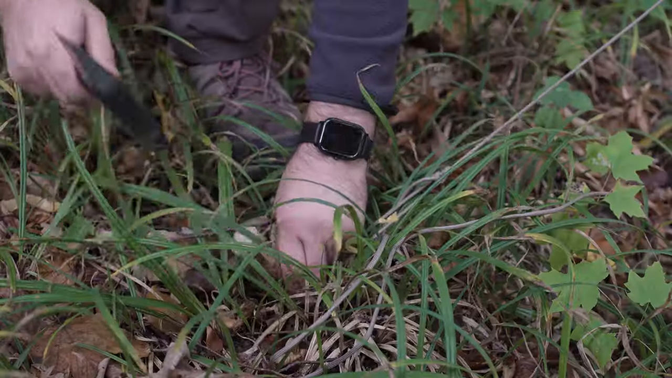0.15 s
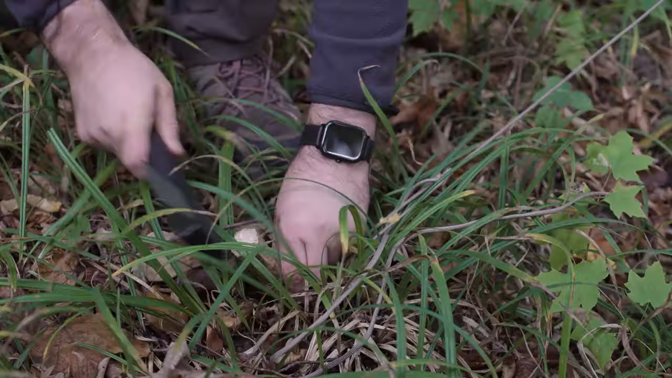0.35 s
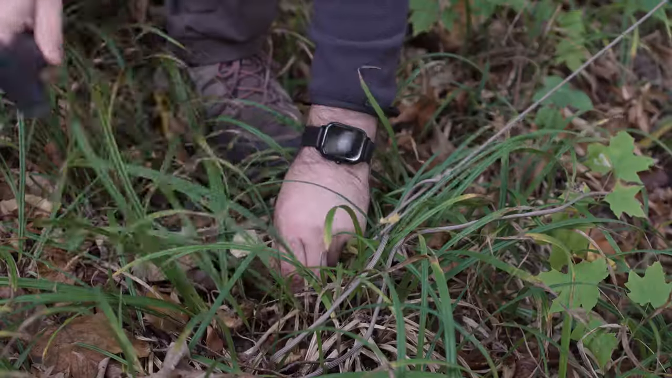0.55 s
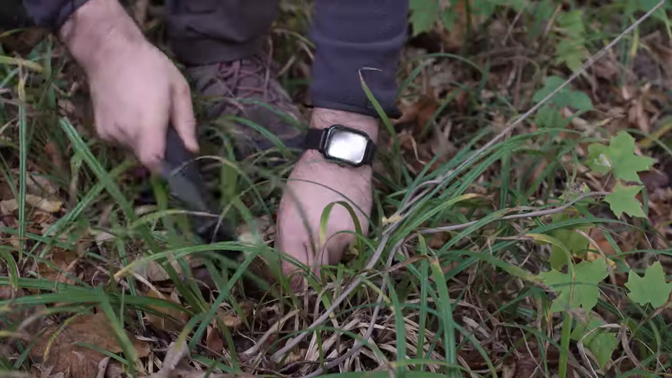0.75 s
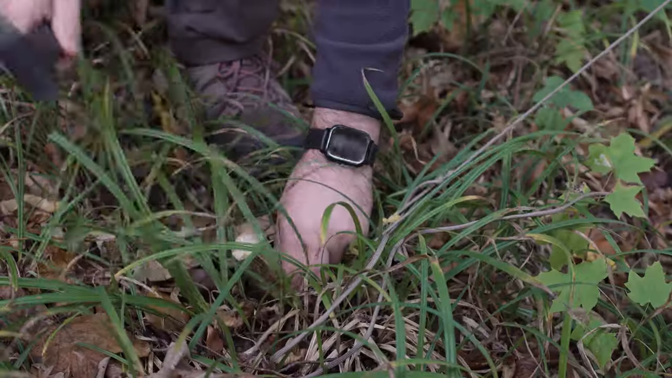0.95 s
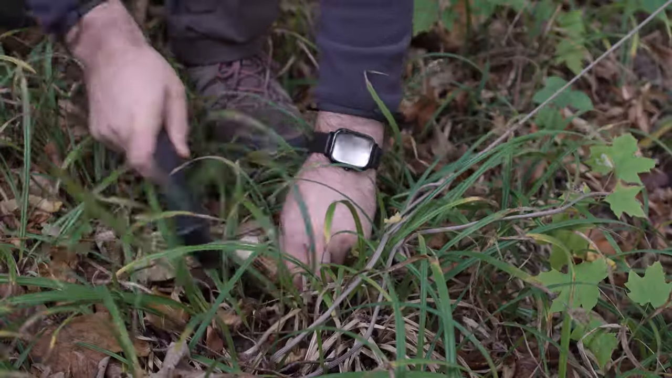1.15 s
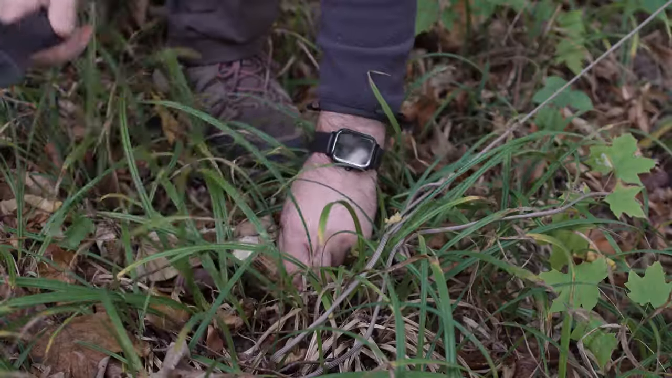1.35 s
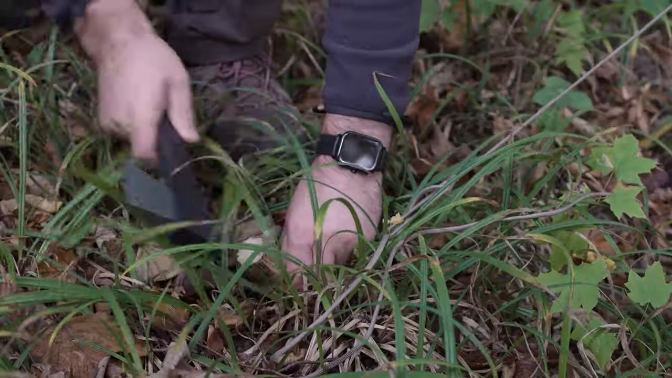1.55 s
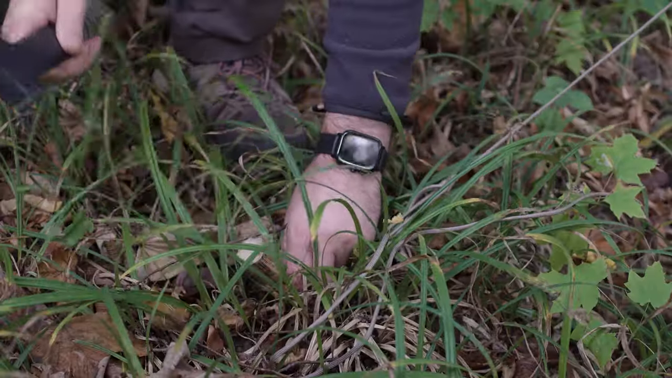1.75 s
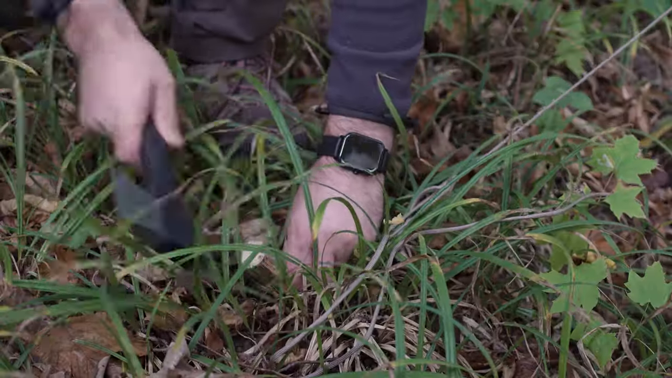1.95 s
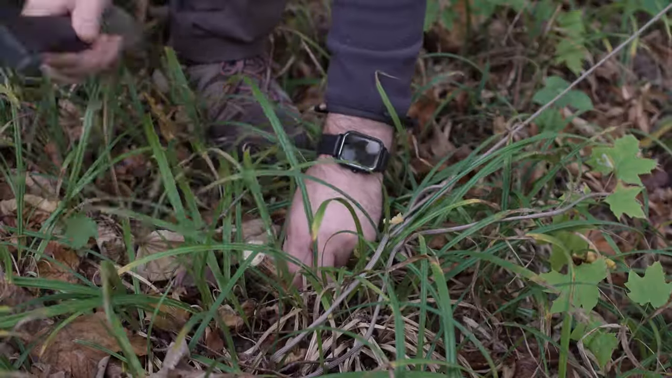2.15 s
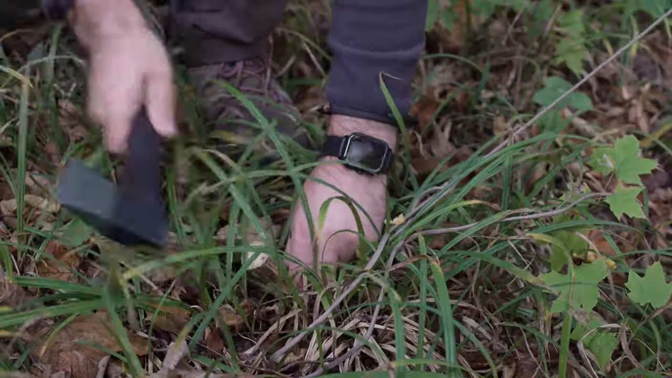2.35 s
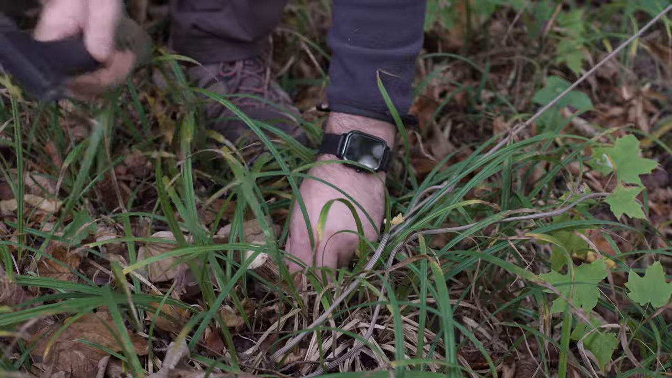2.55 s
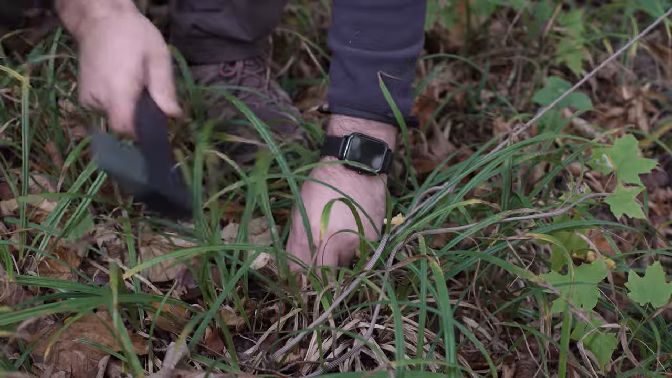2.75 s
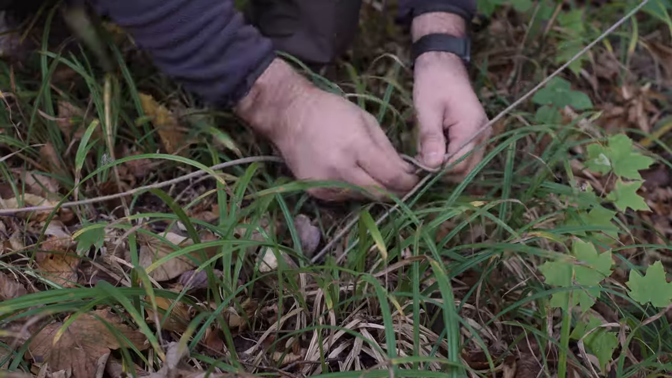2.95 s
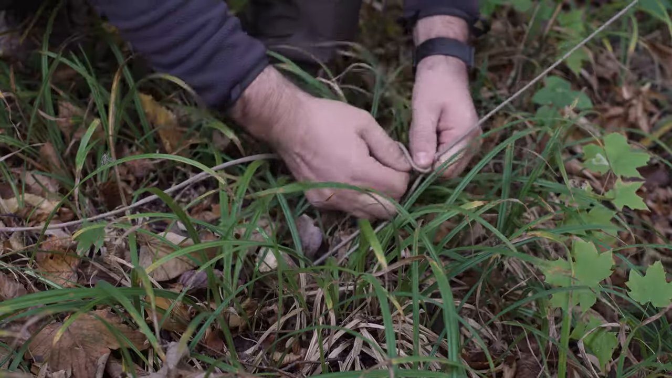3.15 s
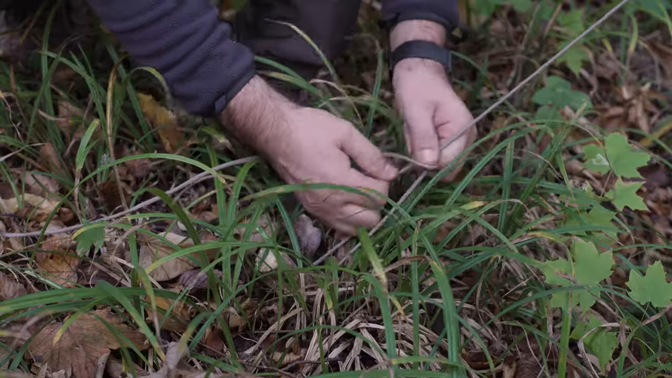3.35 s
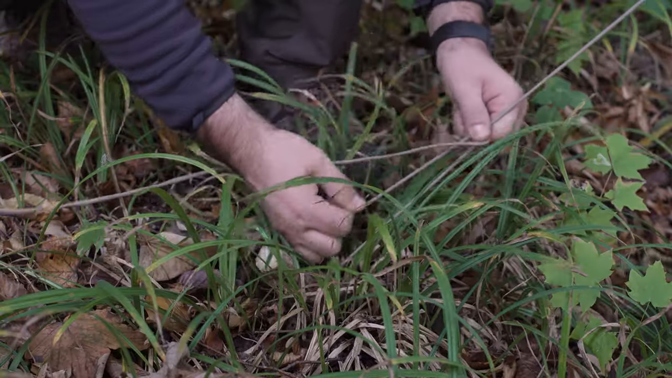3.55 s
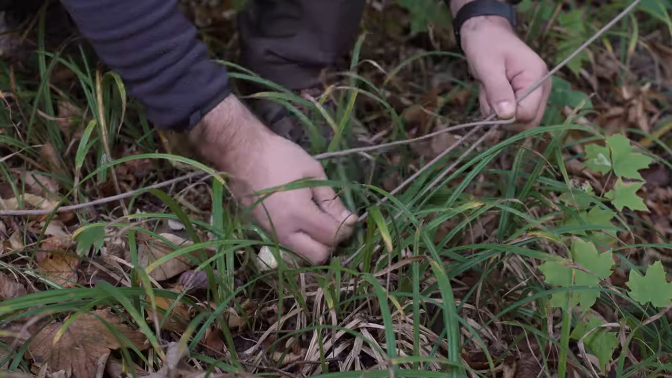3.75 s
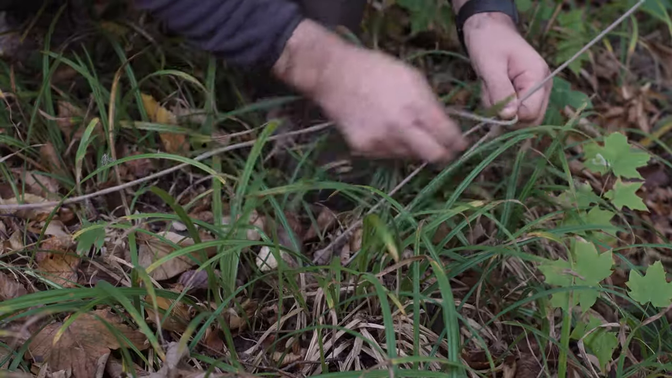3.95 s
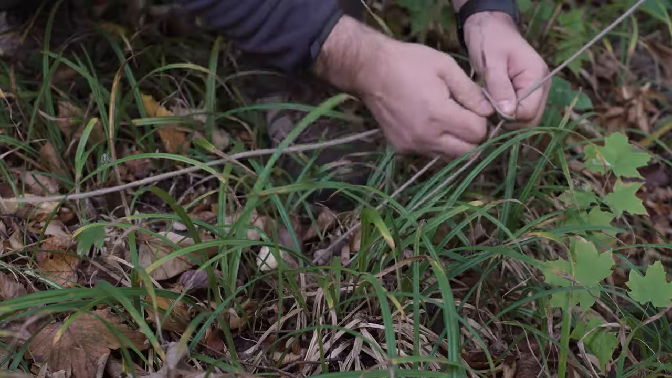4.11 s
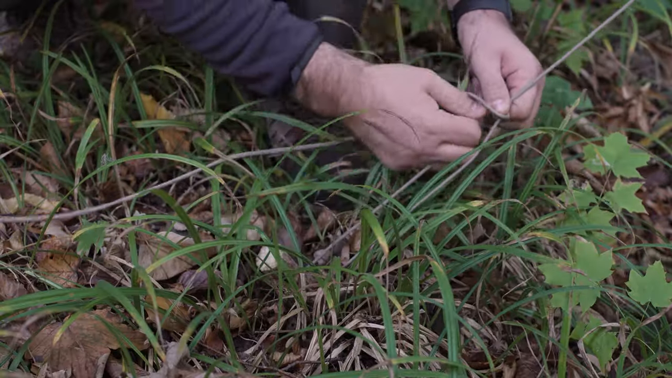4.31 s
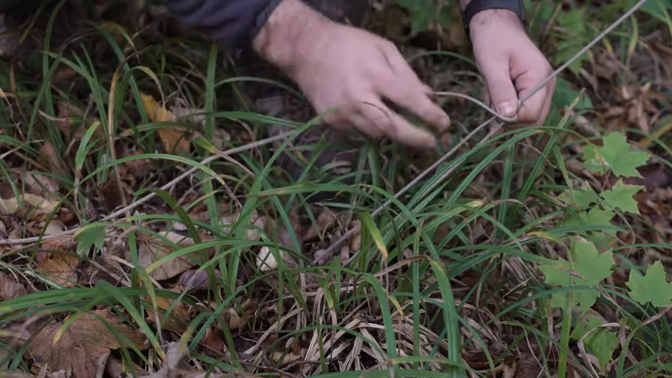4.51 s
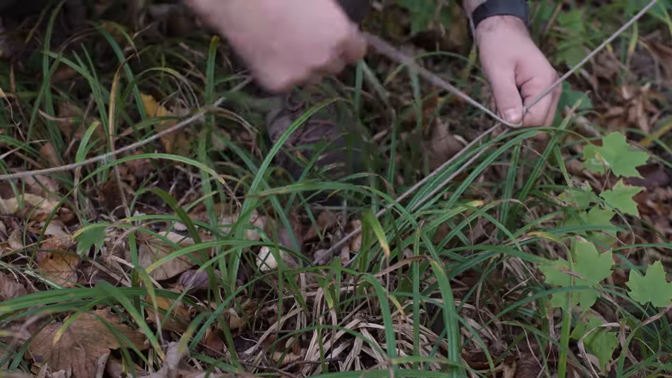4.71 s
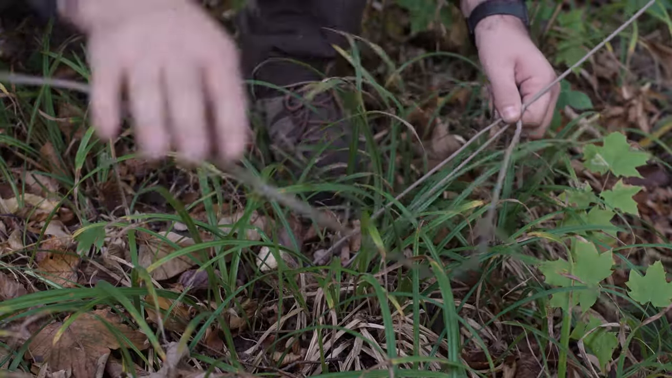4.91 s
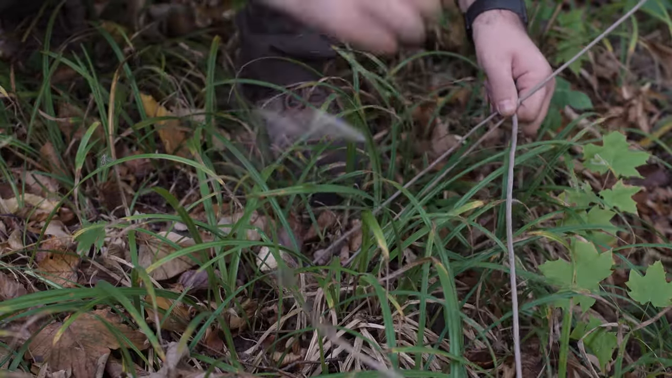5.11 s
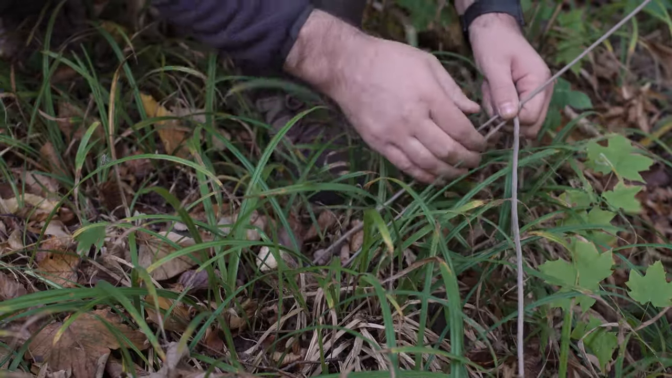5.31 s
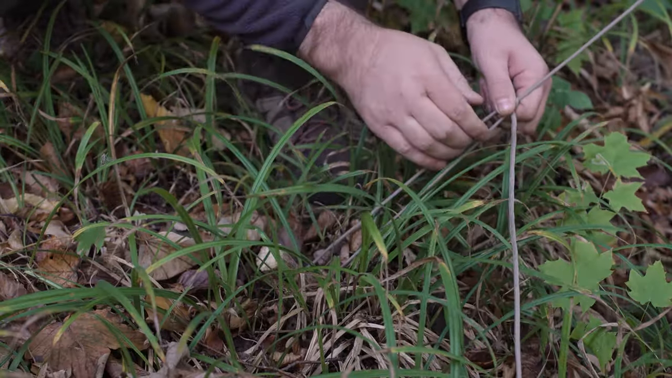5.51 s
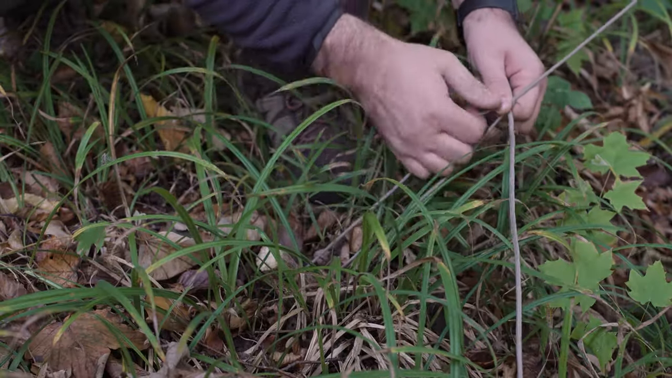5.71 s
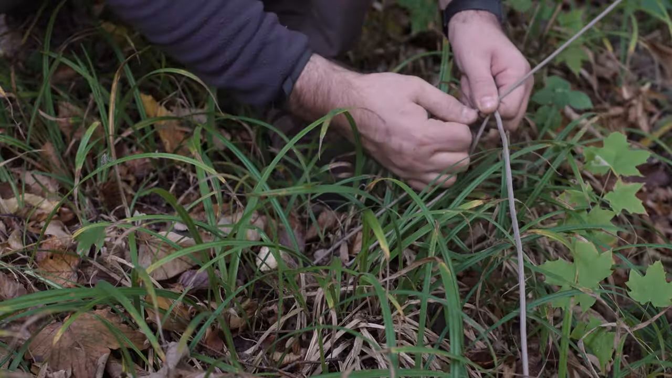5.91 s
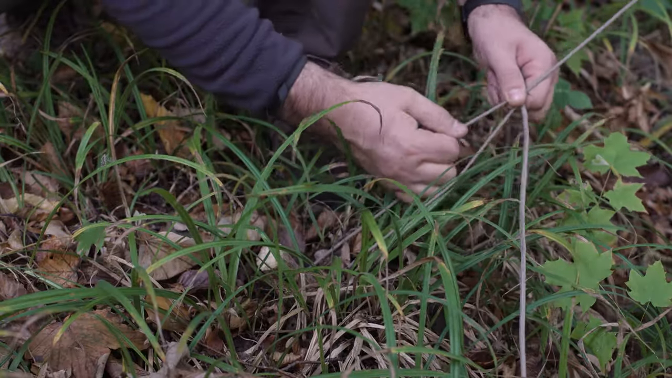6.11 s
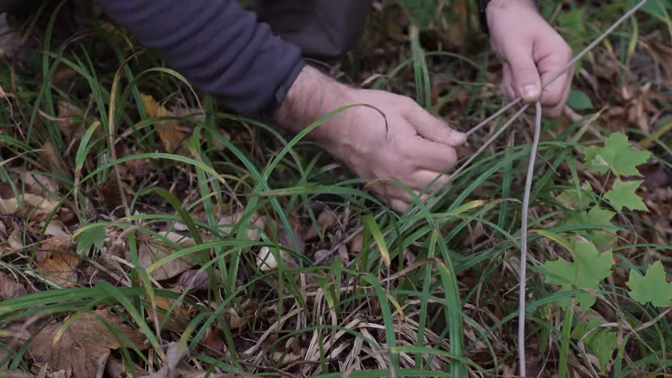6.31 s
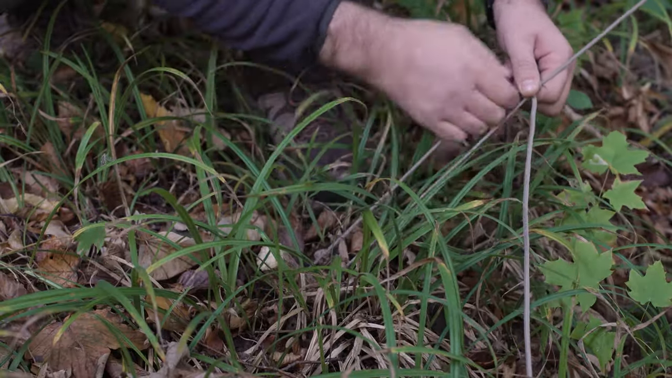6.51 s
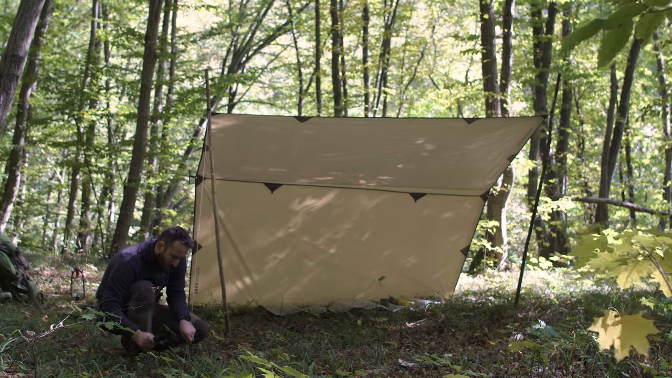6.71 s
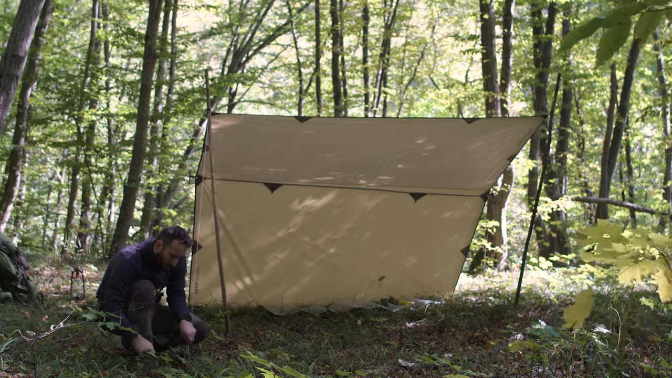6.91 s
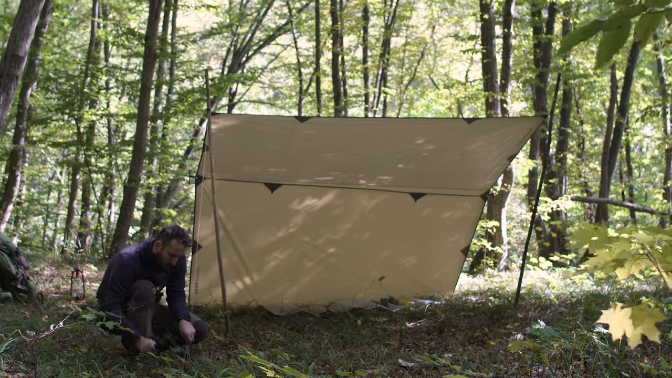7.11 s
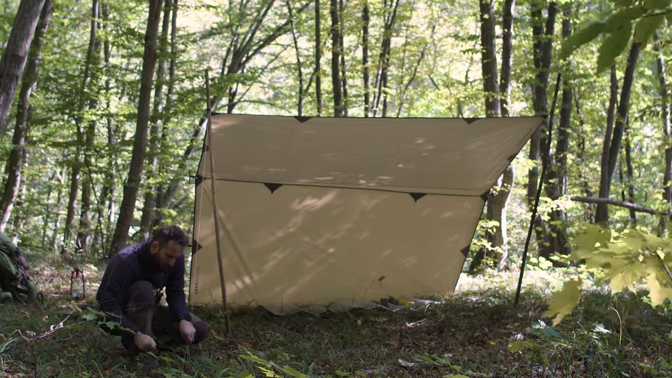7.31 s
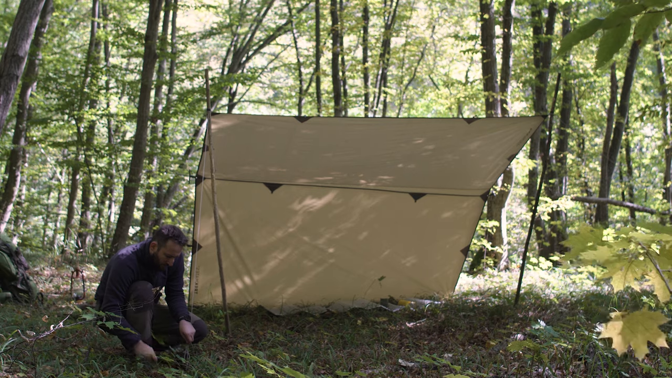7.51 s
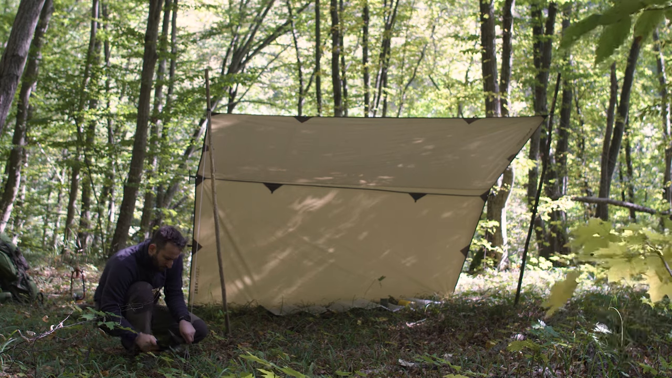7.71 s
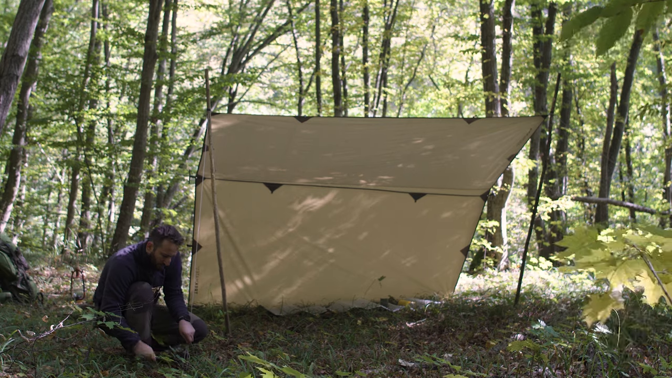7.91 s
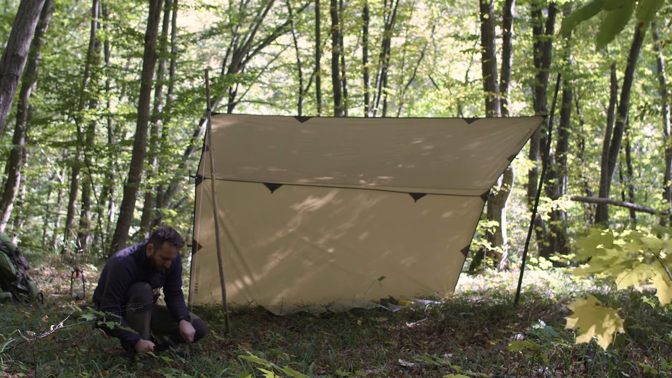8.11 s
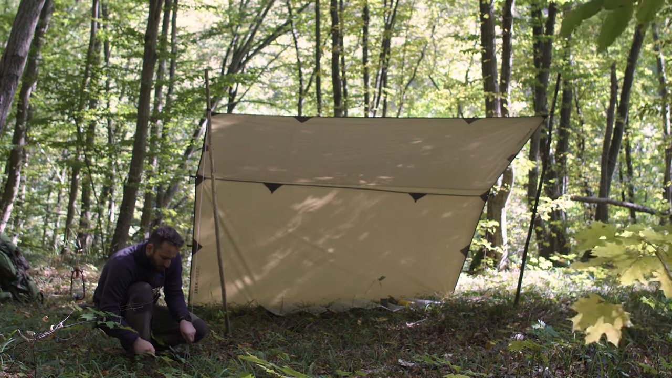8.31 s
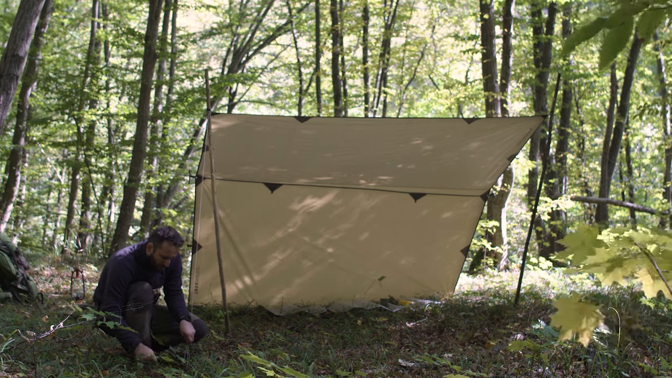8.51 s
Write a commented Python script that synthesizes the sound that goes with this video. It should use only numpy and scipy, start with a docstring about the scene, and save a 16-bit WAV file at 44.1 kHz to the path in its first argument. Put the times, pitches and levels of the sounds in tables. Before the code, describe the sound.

Quiet forest air, a soft low hiss. From 0 s grass and sleeve rustle very close, with a faint tap and tiny stalk ticks. At 0.43 s a stake takes the first of seven hard knocks, about 0.38 s apart, ending at 2.74 s. Each is short, woody and clacking, with a dull soil thump, a swish of grass and a brief scattered echo from trunks; some are duller, others sharper and splintery, and the loudest clip. From 3 to 6.6 s hands work cord through grass: soft uneven strokes, dry leaf crackle, small snaps, the clearest near 3.7 s, gradually fainter. At 6.7 s the air changes abruptly, with a trace of echo hanging over. Five quicker knocks follow from 6.96 to 8.32 s, about 0.34 s apart, some metres away, brighter and thinner, with thuds and woodland echoes and little grass.

```python
"""Stakes knocked into forest soil

A stake is knocked in close by, the swing brushing grass; hands work a cord through grass and dry leaves.
After a cut a second stake is knocked in some metres away, over a different air noise.
Stakes and soil are sums of decaying modes; trunk echoes and scattered noise return each contact click.
Grass and leaves are coloured grains, stalks snap as short rings, and air is slowly swelling noise.
The loudest knocks overload the input.
"""
import sys
import numpy as np
from scipy import signal
from scipy.fft import rfft, irfft
from scipy.io import wavfile
from scipy.ndimage import uniform_filter1d

SR = 44100
rng = np.random.default_rng(int(sys.argv[2]) if len(sys.argv) > 2 else 0)


def makeup_ratio(level_db):
    """Linear amplitude ratio for a level in decibels (20 dB per factor of ten)."""
    decades = np.asarray(level_db, float) / 20
    return 10 ** decades


def store_pcm(level_fs):
    """Save levels as 16-bit WAV."""
    pcm = np.round(np.clip(level_fs, -1, 1) * 32767).astype(np.int16)
    wavfile.write(sys.argv[1], SR, np.atleast_2d(pcm).T)


N = 377055


def fade(t, t60):
    """Exponential decay: from t = 0 the level falls 60 dB in t60 seconds."""
    return (t >= 0) * np.exp(-np.log(1000) * np.abs(t) / t60)


def ring(t, hz, t60):
    """Damped mode: a sinusoid that decays exponentially from t = 0."""
    return np.sin(2 * np.pi * hz * t) * fade(t, t60)


def add(out, s, make, length):
    """Superposition: add make(time since s) to out for length seconds."""
    i = np.arange(max(int(s * SR), 0), min(int((s + length) * SR), N))
    out[i] += make(i / SR - s)


def coloured(x, points):
    """Spectral shaping: filter x along (Hz, dB) points, then set its rms to 1."""
    hz, db = np.transpose(points)
    grid = np.log(np.fft.rfftfreq(len(x), 1 / SR) + 1)
    gain = makeup_ratio(np.interp(grid, np.log(hz), db))
    y = irfft(rfft(x) * gain, len(x))
    return y / np.sqrt(np.mean(y ** 2))


def walk(rate):
    """Slow random modulation: rate levels a second, joined by slides, rms about 0.8."""
    k = int(SR / rate)
    held = np.repeat(rng.standard_normal(N // k + 1), k)
    return uniform_filter1d(held, k)[:N]


# blows of the tool: (time [s], knock level [dB], hardness [0-1], thump level [dB])
BLOWS = [(0.42732, -1.2, 0.0, 0.4), (0.82446, 0.0, 0.18, 0.8), (1.2114, 0.8, 0.14, 1.2),
         (1.59395, 0.1, 0.93, -2.6), (1.97459, 0.7, 0.13, 0.5), (2.35921, -0.8, 1.0, -1.3),
         (2.73773, 0.7, 0.91, -0.6), (6.96223, 0.3, 0.63, 0.5), (7.30318, -0.3, 1.0, 0.1),
         (7.65068, 0.3, 0.89, 0.0), (7.98531, 0.1, 1.0, 0.7), (8.31645, -0.2, 0.36, -2.1)]
# modes of stake and tool: (frequency [Hz], t60 [s], signed amplitude of a dull blow, of a hard blow)
NEAR_STAKE_MODES = [(349.0, 0.0055, 1.58, 2.82), (790.0, 0.0064, -3.06, -1.52), (1086.0, 0.0096, 1.3, 0.48),
                    (1333.0, 0.0074, 2.01, 1.67), (1777.0, 0.0098, -1.59, -0.74),
                    (1912.0, 0.0149, -0.78, -1.19), (1988.0, 0.0175, 0.07, -0.89),
                    (2439.0, 0.0047, 1.58, 0.96), (2923.0, 0.0115, -0.63, 0.23),
                    (3457.0, 0.0181, 0.05, 0.66), (4453.0, 0.0072, -0.05, -0.72)]
FAR_STAKE_MODES = [(722.0, 0.0075, -0.41, -0.39), (1077.0, 0.0086, 0.36, 0.2), (1820.0, 0.0078, 0.21, 0.48),
                   (2101.0, 0.0102, 0.26, 0.46), (2475.0, 0.0057, -0.37, -0.57),
                   (2929.0, 0.0192, 0.07, 1.1), (2937.0, 0.0098, -0.12, -2.24),
                   (3422.0, 0.006, -0.12, 1.29), (3846.0, 0.0077, 0.14, -0.43)]
# faint longer modes of the tool: (frequency [Hz], t60 [s], amplitude of a dull blow, of a hard blow)
TOOL_MODES = [(794, 0.22, 0.013, 0.011), (1345, 0.31, 0.016, 0.01), (2866, 0.045, 0.059, 0.046)]


def stake(blows, modes):
    """Modal excitation: a harder blow shifts the weight between the modes, which sound for 60 ms."""
    out = np.zeros(N)
    for s, db, hard, _ in blows:
        def knock(t):
            weighted = [(dull + hard * (sharp - dull)) * ring(t, hz, t60) for hz, t60, dull, sharp in modes]
            return makeup_ratio(db) * sum(weighted)
        add(out, s, knock, 0.06)
    return out


# waves through the soil: (arrival after the blow [s], frequency [Hz], t60 [s], signed amplitude)
NEAR_SOIL_WAVES = [(0.0008, 300.0, 0.013, 0.76), (0.0052, 282.0, 0.27, -0.038),
                   (0.0071, 149.0, 0.052, -0.138), (0.0084, 99.0, 0.16, 0.111),
                   (0.0097, 247.0, 0.076, -0.081), (0.0167, 189.0, 0.054, -0.186),
                   (0.0168, 84.0, 0.012, 0.294), (0.0176, 153.0, 0.139, -0.121),
                   (0.0257, 165.0, 0.045, 0.095), (0.0278, 95.0, 0.15, -0.053)]
FAR_SOIL_WAVES = [(0.0003, 154.0, 0.107, 0.521), (0.0007, 281.0, 0.023, -0.809),
                  (0.0024, 162.0, 0.049, -0.544), (0.0036, 208.0, 0.031, 0.757),
                  (0.0089, 230.0, 0.049, -0.148), (0.0148, 142.0, 0.058, 0.351),
                  (0.0148, 160.0, 0.047, -0.371)]
LIGHT_TAP = (0.04, -33.5)  # heard through the soil only: (time [s], level [dB])


def soil(blows, waves):
    """Multipath propagation: slow ground waves arrive late and in bursts, each a damped mode."""
    out = np.zeros(N)
    for s, db in blows:
        def thump(t):
            return makeup_ratio(db) * sum(a * ring(t - lag, hz, t60) for lag, hz, t60, a in waves)
        add(out, s, thump, 0.4)
    return out


# scattered rumble of the soil: (level re thump [dB], t60 [s], low edge [Hz], high edge [Hz])
NEAR_RUMBLE = (-34.5, 0.35, 60, 255)
FAR_RUMBLE = (-38, .3, 90, 398)


def rumble(blows, db, t60, low_hz, high_hz):
    """Diffuse scattering: band-limited noise swells in behind each thump and dies."""
    t = np.arange(N) / SR
    sos = signal.butter(2, [low_hz, high_hz], "band", fs=SR, output="sos")
    noise = signal.sosfilt(sos, rng.standard_normal(N))
    shape = np.zeros(N)
    for s, *_, thump_db in blows:
        swell = np.clip((t - s) / 0.023, 0, 1)
        shape += makeup_ratio(db + thump_db) * fade(t - s, t60) * swell
    return shape * noise / np.std(noise)


def ticks(blows):
    """Impulsive contact: a broad, slightly frayed click goes out into the wood, stronger if hard."""
    wood_db_per_hardness = 8
    out = np.zeros(N)
    for (s, db, hard, _), noise in zip(blows, rng.standard_normal((len(blows), 200))):
        i = int(s * SR)
        click = 0.11 * noise * fade(np.arange(200) / SR, 0.0048)
        click[0] = 1
        out[i:i + 200] += makeup_ratio(db + wood_db_per_hardness * hard) * click
    return out


# echoes of single trunks: (delay [s], level re the whole scatter [dB])
NEAR_TRUNKS = [(0.027, -4.5), (.039, -1), (.049, -11)]
FAR_TRUNKS = [(.0235, -3), (0.032, -5.5), (.045, -14)]
# the wood as a whole: (first return [s], t60 [s], level [dB])
NEAR_WOOD, FAR_WOOD = (0.019, 0.5, -12.5), (0.016, 0.57, -12.5)
# colour of what the wood returns: (frequency [Hz], level [dB])
NEAR_WOOD_COLOUR = [(300, -15), (800, -13.5), (1400, -5), (2500, -7.5), (3700, 2.5), (4600, -13.5),
                    (6000, -21), (12000, -26)]
FAR_WOOD_COLOUR = [(300, -12), (1100, -6), (1800, -9), (2500, -3.5), (3200, 1), (4200, -7), (5500, -18.5),
                   (12000, -31)]


def forest(clicks, trunks, wood, colour):
    """Impulse response: a few clear trunk echoes with a scatter of many that swells and dies."""
    first, t60, db = wood
    t = np.arange(SR) / SR
    uneven = rng.standard_normal(SR) * makeup_ratio(1.9 * walk(148)[:SR])
    scatter = uneven * fade(t - first, t60) * np.clip((t - first) / 0.0093, 0, 1)
    reply = scatter / np.sqrt(np.sum(scatter ** 2))  # unit energy
    for lag, trunk_db in trunks:
        reply[int(lag * SR)] += makeup_ratio(trunk_db)
    wet = signal.fftconvolve(clicks, reply)[:N]
    wet_rms = np.sqrt(np.mean(wet ** 2))
    return makeup_ratio(db) * coloured(wet, colour) * wet_rms


# strokes of the hands through the grass:
# (start [s], length [s], level at the start [dB], at the end [dB], dry-leaf level re the stroke [dB])
STROKES = [(3.001, 0.088, -47.5, -40.5, -3), (3.138, 0.057, -47.5, -44.5, -1), (3.23, .16, -53.5, -45, 1),
           (3.444, 0.28, -40.5, -36.5, 2), (3.782, 0.057, -51, -47, 5), (3.877, 0.15, -35.5, -39.5, 1),
           (4.051, 0.11, -47, -40, -1.5), (4.184, 0.27, -51, -58.5, -1), (4.498, 0.063, -44, -51, -1),
           (4.582, 0.17, -55, -53.5, 3.5), (4.785, 0.075, -50.5, -46.5, -0.5), (4.889, 0.078, -39, -39, -2),
           (4.994, 0.13, -47.5, -57, -2.5), (5.178, 0.057, -47.5, -46.5, -2.5),
           (5.262, 0.027, -45.5, -40.5, 1.5), (5.321, .12, -45, -42.5, 1.5), (5.462, .11, -55, -58, 3.5),
           (5.6, 0.17, -58.5, -62, -3), (5.802, 0.12, -57.5, -52, 2), (5.986, 0.081, -57, -46, 2.5),
           (6.133, 0.15, -50, -46, 2), (6.302, 0.068, -59, -55.5, 3.5), (6.404, 0.24, -56, -56, -1.5)]


def strokes(t):
    """Frictional envelope: strokes set in and stop quickly; between, the level slides start to end."""
    edge_s = 0.012
    hands, leafy = np.zeros(N), np.zeros(N)
    for s, length, start_db, end_db, leaf_db in STROKES:
        outside = np.maximum(np.maximum(s - t, t - s - length), 0)
        level = makeup_ratio(np.interp(t, [s, s + length], [start_db, end_db]))
        stroke = level * np.exp(-outside / edge_s)
        hands += stroke
        leafy += makeup_ratio(leaf_db) * stroke
    return hands, leafy


def grains(density, scatter_db):
    """Granular noise: density tiny clicks a second, of uneven size, over a little hiss."""
    sizes = np.minimum(rng.exponential(size=N), 4.3)
    clicks = (rng.random(N) < density / SR) * makeup_ratio(scatter_db * sizes)
    return (clicks + 0.26) * rng.standard_normal(N)


def patchy(x, patchy_db, rate):
    """Independent band modulation: every half octave from 1 to 16 kHz flickers on its own."""
    out = x.copy()
    for hz in 1000 * 2 ** np.arange(0, 4, 0.5):
        sos = signal.butter(2, [hz, hz * np.sqrt(2)], "band", fs=SR, output="sos")
        band = signal.sosfiltfilt(sos, x)
        out += band * (makeup_ratio(patchy_db * walk(rate)) - 1)
    return out


# grass at each near blow: (swing level [dB], splintery crack level [dB])
GRASS = [(-37.5, -16), (-35, -16), (-30, -13), (-33.5, -7), (-30, -4.5), (-33.5, -5.5), (-35, -6.5)]
# sleeve and grass between blows: (time [s], level [dB])
STIR = [(0.0, -53), (0.06, -54.5), (0.19, -57), (1.19, -73), (1.59, -61.5), (2.76, -65), (2.92, -69)]
# colours of grass blades, dry leaves and splintery crack: (frequency [Hz], level [dB])
BLADES_COLOUR = [(100, -28), (600, -13), (2650, -12.5), (4500, -4.5), (8270, -2.5), (9200, -6.5),
                 (12200, -4.5), (15100, -7), (16300, -29)]
LEAVES_COLOUR = [(88, -56), (150, -30), (287, -12.5), (516, -12.5), (574, -6.5), (741, -14.5), (787, -13.5),
                 (2200, -7), (3300, -1.5), (5500, -13), (7150, -41), (12100, -120)]
CRACK_COLOUR = [(600, -6), (2500, -3), (4000, 8), (6500, -3.5), (10000, -5), (15500, -11), (16300, -34)]


def grass():
    """Granular friction: blades hiss and leaves crackle under swing, shaken stake and hands."""
    swing_lead_s = 0.0095  # the swing is loudest just before contact
    swing_rise_s, swing_fall_s = 0.011, 0.012  # time constants
    shake_t60_s, crack_t60_s = 0.34, 0.015
    shake_re_swing_db = -4.5
    far_swing_db, far_shake_db, far_crack_db, crack_db_per_hardness = -50, -49.5, -25, 5.5

    t = np.arange(N) / SR
    hands, leafy = strokes(t)
    stir = makeup_ratio(np.interp(t, *np.transpose(STIR), right=-120))
    leafy = leafy + makeup_ratio(2.0) * stir

    near = [(swing_db, swing_db + shake_re_swing_db, crack_db) for swing_db, crack_db in GRASS]
    far = [(far_swing_db, far_shake_db, far_crack_db + crack_db_per_hardness * hard)
           for _, _, hard, _ in BLOWS[len(GRASS):]]
    blows, crack = np.zeros(N), np.zeros(N)
    for (at, *_), (swing_db, shake_db, crack_db) in zip(BLOWS, near + far):
        from_peak = t - at + swing_lead_s
        slope_s = np.where(t < at - swing_lead_s, swing_rise_s, swing_fall_s)
        blows += makeup_ratio(swing_db) * np.exp(-np.abs(from_peak) / slope_s)
        blows += makeup_ratio(shake_db) * fade(t - at, shake_t60_s)
        crack += makeup_ratio(crack_db) * fade(t - at, crack_t60_s)

    flutter = makeup_ratio(2.54 * walk(25) + 1.3 * walk(160))
    blades = coloured(grains(2500, 2.54), BLADES_COLOUR) * flutter * (hands + stir + blows)
    leaves = coloured(grains(900, 2.9), LEAVES_COLOUR) * flutter * (leafy + makeup_ratio(-2.5) * blows)
    rustle = patchy(blades + leaves, patchy_db=2.0, rate=25)
    return rustle + crack * coloured(rng.standard_normal(N), CRACK_COLOUR)


# snapping stalks: (time [s], level of the ring [dB], frequency [Hz])
SNAPS = [(0.0383, -19, 7650), (0.0563, -22, 6660), (0.4164, -25, 2390), (0.7203, -28, 9050),
         (1.1307, -26.5, 7500), (1.1874, -21, 6000), (1.4551, -33, 3640), (1.5735, -16, 3140),
         (2.345, -33, 3200), (2.8464, -29, 3690), (3.2467, -26, 4330), (3.4234, -25, 6120),
         (3.4555, -24, 2680), (3.6759, -10, 2670), (3.8774, -25, 3570), (4.505, -22, 2810),
         (4.995, -37, 2430), (5.0243, -25.5, 4860), (5.0821, -26, 3470), (5.1151, -32, 3100),
         (5.2084, -28, 3260), (6.005, -26.5, 3430), (6.2065, -29, 3480), (6.342, -23, 3050),
         (6.4936, -40, 2540), (6.6164, -36, 3150)]


def snaps():
    """Impulsive fracture: a short ring of about ten cycles with a thin noise tick on top."""
    out = np.zeros(N)
    ticks_noise = np.diff(rng.standard_normal((len(SNAPS), 400)), axis=1)  # tilted to the treble
    for (s, db, hz), noise in zip(SNAPS, ticks_noise):
        def snap(t):
            tick = 0.21 * noise[:len(t)] * fade(t, 0.0066)
            return makeup_ratio(db) * (ring(t, hz, 10.2 / hz) + tick)
        add(out, s, snap, 0.008)
    return signal.sosfilt(signal.butter(2, 900, "high", fs=SR, output="sos"), out)


# colour of the air near each stake: (frequency [Hz], level [dB])
NEAR_AIR_COLOUR = [(12, -34), (20, -12), (75, -21), (108, -15.5), (164, -12), (199, -11.5), (349, -9),
                   (425, -6.5), (685, -7), (2160, -12.5), (2350, -11), (7020, -26.5), (10100, -29.5),
                   (16300, -33.5)]
FAR_AIR_COLOUR = [(12, -39), (20, -12), (120, -15), (194, -10.5), (236, -14), (391, -7), (425, -9),
                  (503, -6), (666, -4.5), (932, -6.5), (2420, -8.5), (7640, -27.5), (15000, -32),
                  (16300, -42)]
NEAR_AIR_DB, FAR_AIR_DB = -50.5, -48  # level about which the air swells


def air(points, db):
    """Stationary noise, slowly modulated: distant leaves and input hiss, swelling a little."""
    level = makeup_ratio(db + 0.46 * walk(1.39) + 0.92 * walk(14))
    return level * coloured(rng.standard_normal(N), points)


CUT_S = 6.685
EARLIER_BLOW = (6.615, 0.84)  # its echo hangs over the cut: (time [s], knock level [dB])


def scene():
    """Superposition: the near stake up to the cut, the far one after it; grass and snaps throughout."""
    near = [b for b in BLOWS if b[0] < CUT_S]
    far = [(*EARLIER_BLOW, 1, 0)] + [b for b in BLOWS if b[0] > CUT_S]

    # b[::3] is a blow's time and thump level
    before = stake(near, NEAR_STAKE_MODES + TOOL_MODES)
    before += soil([LIGHT_TAP] + [b[::3] for b in near], NEAR_SOIL_WAVES)
    before += rumble(near, *NEAR_RUMBLE)
    before += forest(ticks(near), NEAR_TRUNKS, NEAR_WOOD, NEAR_WOOD_COLOUR)
    before += air(NEAR_AIR_COLOUR, NEAR_AIR_DB)

    after = stake(far, FAR_STAKE_MODES)
    after += soil([b[::3] for b in far], FAR_SOIL_WAVES)
    after += rumble(far, *FAR_RUMBLE)
    after += forest(ticks(far), FAR_TRUNKS, FAR_WOOD, FAR_WOOD_COLOUR)
    after += air(FAR_AIR_COLOUR, FAR_AIR_DB)

    knocking = np.where(np.arange(N) / SR < CUT_S, before, after)
    return (knocking + grass() + snaps())[None]


def roll_off(x):
    """The treble ends steeply here."""
    return signal.sosfilt(signal.butter(12, 16430, fs=SR, output="sos"), x)


def record(dry):
    """Amplitude limiting: the overloaded input clips at full scale."""
    mix = np.clip(dry, -1, 1)
    return roll_off(mix)


dry = scene()
out = record(dry)
store_pcm(out)
```